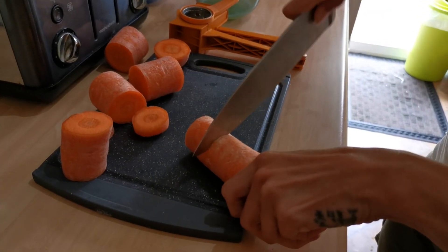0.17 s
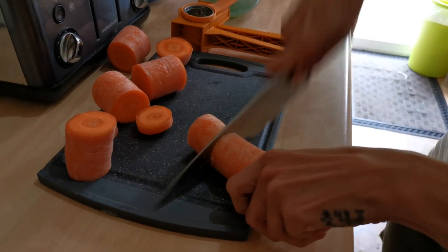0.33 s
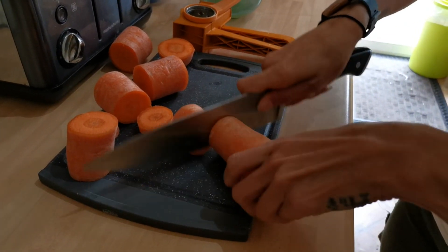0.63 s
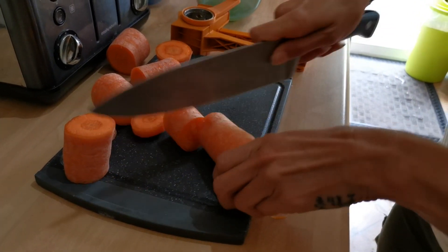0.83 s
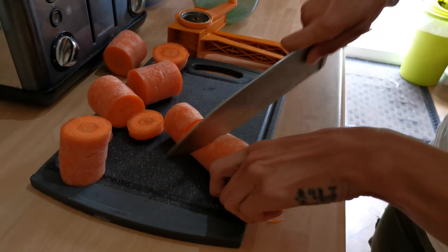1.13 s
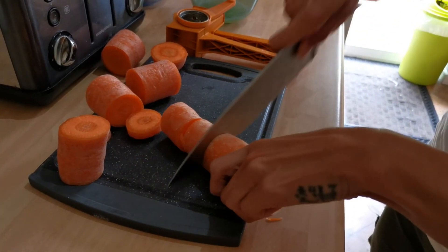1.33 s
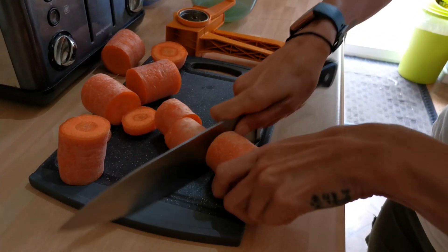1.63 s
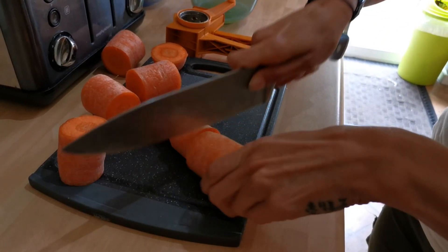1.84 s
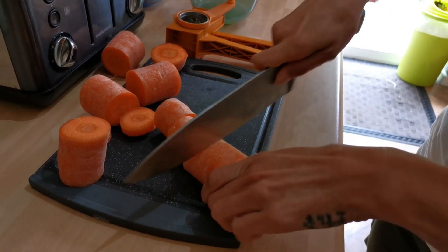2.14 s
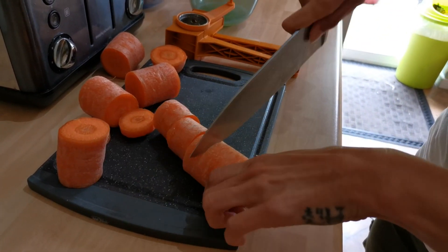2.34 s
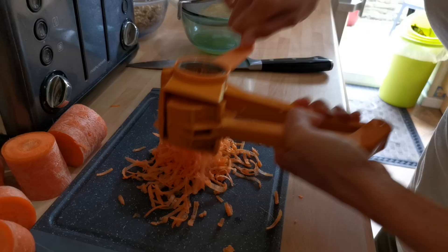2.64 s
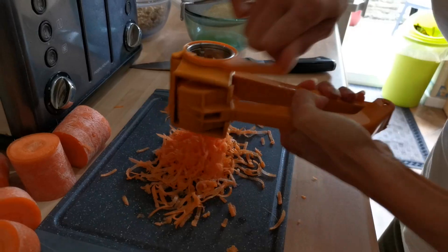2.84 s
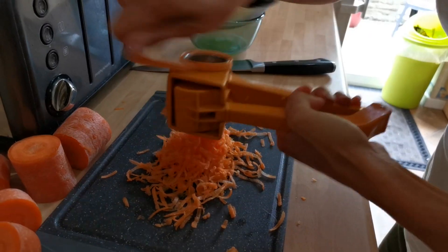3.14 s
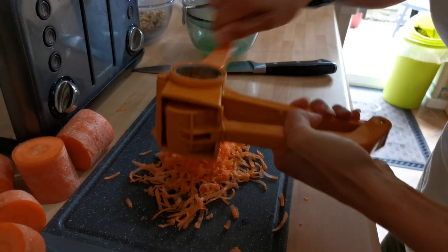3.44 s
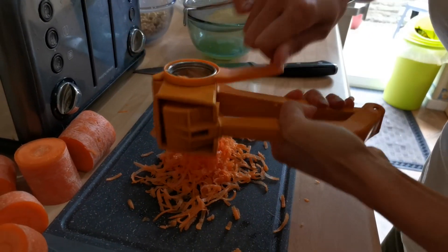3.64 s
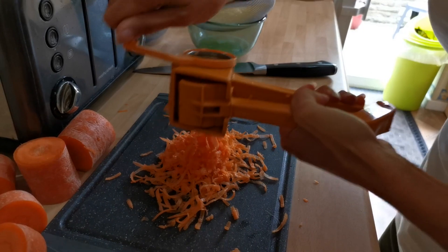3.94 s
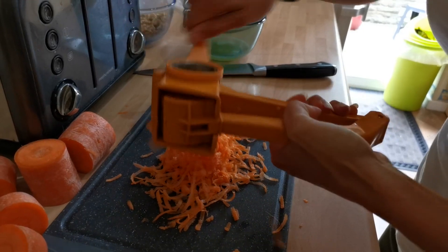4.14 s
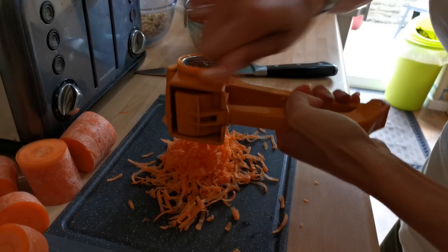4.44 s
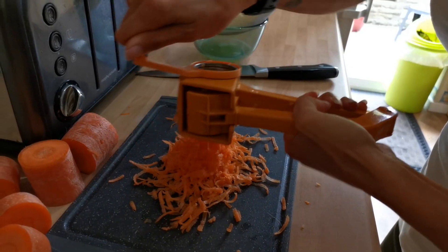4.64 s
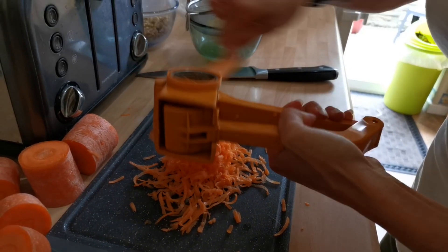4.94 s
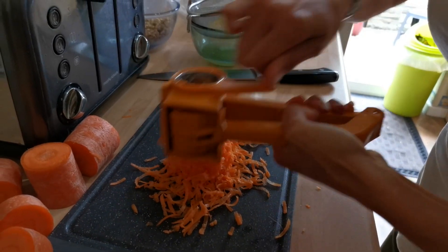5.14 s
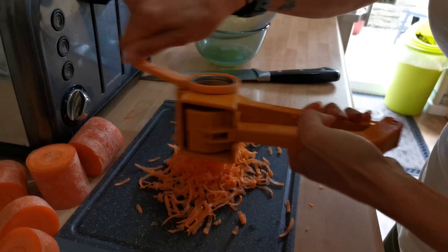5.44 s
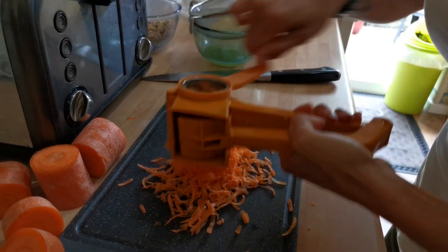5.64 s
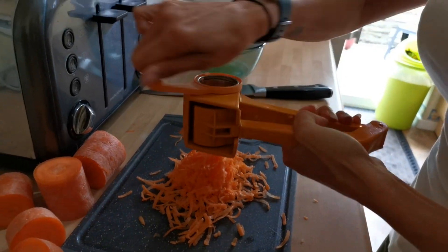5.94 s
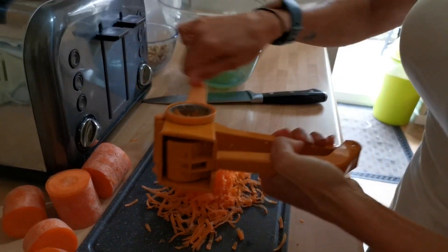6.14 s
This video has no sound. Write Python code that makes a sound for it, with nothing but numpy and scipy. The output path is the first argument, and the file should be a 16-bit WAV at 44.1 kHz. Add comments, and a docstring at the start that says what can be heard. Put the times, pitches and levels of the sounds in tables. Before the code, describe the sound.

In a small, quiet kitchen, a knife cuts a raw carrot three times, about a second apart. Each cut is a short wet hiss, a crisp crack and a knock on a plastic board, with pieces tumbling softly in between. After a brief silence, a hand-cranked drum grater shreds carrot in uneven, rasping strokes with small clicks, over a faint low rumble and motor hum. Everything sounds close.

```python
"""Over faint room tone in a small kitchen, a knife cuts a raw carrot three times on a plastic board.
Each time the blade hisses through crushed cells, the carrot splits and the edge knocks on the board;
loose pieces tumble between the cuts. A short silence follows. Then, over a low rumble and a motor's
hum, a hand-cranked drum grater shreds carrot in uneven strokes: its teeth rasp and fizz through
the flesh and excite the resonances of the drum and its plastic housing."""
import sys
import numpy as np
from scipy import signal
from scipy.fft import rfft, irfft, next_fast_len
from scipy.io import wavfile
from scipy.ndimage import uniform_filter1d

SR = 44100
rng = np.random.default_rng(int(sys.argv[2]) if len(sys.argv) > 2 else 0)


def output_pcm(signal):
    """Save a mono or channel-first signal as 16-bit PCM at the path in sys.argv[1].

    Samples are clipped to [-1, 1] before scaling.
    """
    pcm = np.clip(np.atleast_2d(signal).T, -1, 1) * 32767
    wavfile.write(sys.argv[1], SR, np.round(pcm).astype(np.int16))


N = 277829
TIME = np.arange(N) / SR
HZ = np.fft.rfftfreq(8192, 1 / SR)

# Room tone during the cutting and during the grating: frequency_hz, density_db
QUIET_SPECTRUM = [(12, -32.5), (20, 4.5), (108, 2), (155, -7.5), (638, -15.5), (1140, -23),
                  (2770, -23), (4310, -29), (7720, -25), (9630, -35.5), (15000, -46)]
RUMBLE_SPECTRUM = [(15, -3), (40, 2), (80, -14), (115, -3.5), (170, -12), (300, -19.5), (500, -19),
                   (2000, -56)]
# Tones of an appliance motor: pitch_hz, level_db
HUM_TONES = [(23, -93), (45, -70), (100, -70.5), (149, -82)]
# Reverberation time of the kitchen: frequency_hz, t60_s
KITCHEN_DECAY = [(100, 0.39), (300, 0.33), (1000, 0.29), (3000, 0.29), (8000, 0.31), (15000, .22)]
# Level difference between the channels: frequency_hz, left_minus_right_db
KNIFE_BALANCE = [(100, 0.5), (700, 3), (1200, 1.5), (1500, -2.5), (2100, -2.5), (3000, -6.5), (4200, -5.5),
                 (6000, -7.5), (7200, 6.5), (8200, 13.5), (10500, -3), (15000, -6.5)]
GRATER_BALANCE = [(60, 36), (99, 14), (160, 4), (270, -0.5), (450, -3.5), (740, -4), (1220, -4.5),
                  (2010, -7), (3330, -10.5), (5500, 7.5), (9080, 12.5), (15000, 11.5)]
# Likeness of the channels: frequency_hz, coherence_ratio, left_lead_rad
KNIFE_COHERENCE = [(100, 0.93, 0.013), (400, .98, 0.019), (709, 0.97, 0.31), (1402, 0.6, 0),
                   (3100, 0.2, 0.016), (7000, 0.1, 0.11)]
GRATER_COHERENCE = [(100, 0.24, 3), (860, 1, 1.05), (1560, 0.98, 1.13), (2640, 0.8, 0.75), (3400, 0.48, 3),
                    (4400, 1, 2.5), (6860, 0.26, 3), (7830, 0.069, 9), (15100, 0.06, 13.5)]

# Spectral envelopes of the sources: frequency_hz, density_db
GRATER_SPECTRUM = [(120, -47.5), (200, -30.5), (280, -21.5), (430, -27), (560, -20.5), (790, -17),
                   (1200, -13.5), (1750, -7.5), (2100, -3), (3100, 1.5), (3600, -3), (4300, -9),
                   (5500, -12), (6500, -17.5), (7900, -13.5), (10000, -29), (15000, -33)]
FLESH_SPECTRUM = [(80, -20), (250, -12), (450, -17.5), (620, -7.5), (1000, -15), (2100, -7), (4000, -7.5),
                  (6000, -5), (6700, -2), (7850, -5.5), (9000, -16.5), (11000, -20.5), (15000, -26)]
SPLIT_SPECTRUM = [(60, -33.5), (160, -18.5), (450, -14.5), (650, -11.5), (980, -13), (1300, 0), (2250, -10),
                  (2900, -18), (5500, -23), (8000, -37), (10000, -41.5), (15000, -57)]
BOARD_SPECTRUM = [(40, -26), (110, -8), (270, -1), (460, -4.5), (660, -3), (1250, -2), (2200, -8),
                  (3800, -18), (7500, -29.5), (9500, -48.5), (15000, -66.5)]
PIECE_SPECTRUM = [(40, -16), (120, 10.5), (250, 0), (650, -10), (1000, -21), (3000, -36), (12000, -71)]
SKIN_SPECTRUM = [(200, -17), (900, -16), (1800, -8.5), (4000, -10), (7500, -8), (9500, -22), (15000, -27)]
# Spectral envelope of the board's groan about its pitch: offset_octaves, density_db
GROAN_SPECTRUM = [(-2.5, -35.5), (-0.3, -6.5), (0, -0.5), (-1, -5), (0.3, -17), (3.5, -57.5)]
# Normal modes of the solid bodies: centre_hz, width_hz, lift_db
HOUSING_RESONANCES = [(786, 90, 7.3), (1524, 70, 5.5), (2024, 90, 7.7), (2582, 65, 3.6), (3143, 120, 4.7),
                      (3560, 76, 5.6), (4720, 280, 3.7), (5670, 170, 4.8), (7560, 280, 4.8)]
BOARD_RESONANCES = [(130, 30, 3), (258, 40, 5), (365, 30, 6), (605, 65, 8), (780, 40, 3), (865, 35, 5),
                    (1050, 40, 3), (1170, 50, 5), (1260, 70, 6), (1540, 50, 2), (1860, 70, 4),
                    (2220, 120, 4), (2550, 40, 3), (2890, 50, 6), (4600, 250, 4), (5300, 250, 4)]
BLADE_RESONANCES = [(1840, 61, 9), (2808, 180, 3), (4710, 260, -0.5), (5600, 480, 5), (7800, 320, 5.5)]  # damped by the carrot

# Pushes of the crank: start_s, length_s, attack_s, force_db, relative_treble_db, drum_hz
CRANK_STROKES = [ (3.052, 0.08, 0.046, -36.5, -6, 2750), (3.219, .083, 0.03, -40, -4, 3090),
                 (3.353, 0.16, 0.062, -39, -4, 3180), (3.52, 0.11, 0.081, -35.5, -5, 2680),
                 (3.747, 0.1, .004, -38.5, -4, 2720), (3.906, 0.093, 0.052, -35, -4, 3140),
                 (4.097, 0.13, 0.029, -35.5, -2.5, 3040), (4.23, 0.32, 0.03, -37, -3, 2780),
                 (4.524, 0.15, 0.028, -34.5, -3.5, 2880), (4.805, 0.072, .003, -36.5, 0, 3120),
                 (4.887, 0.093, 0.016, -40, 0, 2930), (4.975, 0.19, .025, -35.5, -2, 2750),
                 (5.197, 0.14, 0.12, -33, -3, 2860), (5.34, 0.048, 0.013, -35.5, -1.5, 2830),
                 (5.403, 0.1, 0.042, -34, -2.5, 2780), (5.581, 0.24, 0.056, -34, -3.5, 2780),
                 (5.838, 0.52, 0.017, -35, -3, 2880), (5.97, 0.33, 0.03, -36.5, -2.5, 2700), ]
# The grater sways in the hand: time_s, balance_db (a rise moves it left)
GRATER_SWAY = [(3.1, -9.5), (3.4, -9), (3.75, -6.5), (4.25, -4), (4.7, -2), (5.15, -5), (5.45, -7),
               (5.8, -6), (6.15, -7)]
# The blade slides lightly over the skin: start_s, length_s, force_db
SKIN_GRAZES = [(0.0, 0.018, -72), (0.056, 0.036, -72), (0.15, 0.031, -71.5), (1.102, .08, -70.5),
               (1.25, 0.051, -63), (2.205, 0.056, -74), (2.314, 0.2, -70.5)]
# The blade wedges into the flesh: start_s, length_s, final_force_db, swell_db, groan_db, groan_hz
KNIFE_SLICES = [(0.294, 0.15, -37.5, 31.5, -62, 477), (1.382, 0.11, -37.5, 28.5, -50, 376),
                (1.536, 0.011, -43, 10.5, -60.5, 353), (2.48, 0.15, -40, 32.5, -48.5, 215),
                (2.571, 0.0036, -49.5, 4, -67, 215)]
# The steel rings after the hardest chop: start_s, pitch_hz, level_db, t60_s
BLADE_PARTIALS = [(1.5906, 5760, -23, .06), (1.5905, 7870, -34, .03)]
# Impulsive events: start_s, level_db, decay_s, tilt_db_per_octave, ring_hz
TOOTH_CATCHES = [(3.071, -46, 0.024, -3.5, 2790), (3.1105, -31, 0.015, -1.5, 3200),
                 (3.2235, -39.5, 0.024, 1.5, 3230), (3.25, -37, 0.017, -1, 3300),
                 (3.743, -35, 0.006, 1.5, 2980), (4.108, -41.5, 0.016, -4, 2770),
                 (4.2013, -27.5, 0.0041, 0.5, 3000), (4.5695, -26.5, 0.011, -2.5, 2720),
                 (4.8085, -32, 0.021, 0, 1940), (5.318, -26.5, 0.01, 0, 2480),
                 (5.4655, -25, 0.0074, 2, 2880), (5.603, -32.5, 0.061, 5.5, 2730),
                 (5.656, -25, 0.0034, 6.5, 3400), (5.9548, -22.5, 0.014, 1, 2250)]  # a tooth tears off a shred
CARROT_SPLITS = [(.4462, -20, 0.013, 0, 2250), (1.5055, -21.5, 0.015, -2, 2150),
                 (2.6412, -19, 0.00874, 2.5, 2340)]  # the carrot cracks ahead of the blade
BOARD_CHOPS = [(.5185, -31.5, 0.0049, -2, 560), (.5228, -20, 0.0096, 0, 714),
               (.5412, -22, 0.011, 2.5, 1220), (1.5812, -20.5, 0.0041, -1.5, 236.4),
               (1.5898, -17.5, 0.012, 1, 604), (1.593, -18, 0.0036, 4, 1200),
               (1.765, -37, 0.011, 0.5, 1140), (2.651, -24.5, 0.0073, 0.5, 777)]  # the edge lands on the board
PIECE_TUMBLES = [(.781, -52.5, 0.028, 4, 620), (.848, -60.5, .034, 7.5, 640), (1.002, -58.5, .012, -1, 140),
                 (1.0838, -56, 0.0011, 5.5, 896), (1.096, -55, 0.025, -8.5, 160),
                 (1.596, -39.5, .025, -15, 90), (1.893, -56.5, 0.0122, 6, 400),
                 (1.906, -53, 0.029, 0.5, 270), (2.065, -68, 0.029, -0.5, 158),
                 (2.16, -59, .025, -6.5, 125), (2.643, -35, 0.014, 4.5, 251.7)]  # cut pieces roll and rock
SKIN_NICKS = [(.68, -50.5, 0.026, -5, 1300), (.944, -64, 0.0022, -7, 1300), (1.0875, -50, 0.0086, 1, 2750),
              (2.1525, -50, 0.017, 1, 2680)]  # the blade touches the skin


def amp(db):
    """Amplitude grows tenfold for every 20 dB."""
    return 10 ** (np.asarray(db) / 20)


def unit_rms(x):
    """Normalisation: the mean of the two channels gets an rms of 1."""
    return x / np.sqrt(np.mean(x.mean(0) ** 2) + 1e-20)


def curve(points, hz=HZ):
    """Interpolation of (frequency_hz, value) points on a logarithmic frequency axis."""
    point_hz, value = np.transpose(points)
    return np.interp(np.log(hz + 1), np.log(point_hz + 1), value)


def add(mix, start_s, sound):
    """Superposition: a stereo sound adds to the mix from start_s on."""
    part = mix[:, round(start_s * SR):][:, :sound.shape[1]]
    part += sound[:, :part.shape[1]]


def panned(x, balance_db):
    """A level difference between the channels moves a sound toward the louder side."""
    return x * amp(np.array([[.5], [-.5]]) * balance_db)


def modal_db(modes):
    """Each normal mode raises a Lorentzian peak in a body's decibel spectrum."""
    return sum(db / (1 + (2 * (HZ - hz) / width_hz) ** 2) for hz, width_hz, db in modes)


def colour(x, spectrum_db, balance_db=0):
    """Causality: a minimum-phase filter rings after each click, never before it."""
    relative_db = np.maximum(spectrum_db - spectrum_db.max(), -100)
    log_gain = np.log(panned(amp(relative_db), balance_db))
    mirrored = np.hstack([log_gain, log_gain[:, -2:0:-1]])
    response = np.exp(np.conj(signal.hilbert(mirrored)))
    taps = irfft(response[:, :len(HZ)])
    return signal.oaconvolve(x, taps[:, :len(HZ)], axes=1)[:, :x.shape[1]]


def resonate(x, hz, width_hz):
    """Forced vibration of a damped oscillator whose natural frequency follows the curve hz."""
    turn = np.exp(2j * np.pi * np.cumsum(hz) / SR)
    pole = np.exp(-np.pi * width_hz / SR)
    return 2 * (turn * signal.lfilter([1 - pole], [1, -pole], x / turn)).real


def cohere(x, coherence):
    """Partial coherence: the right channel takes a share of the left and lags it in phase."""
    size = next_fast_len(x.shape[1] + len(HZ))
    left, independent = rfft(x, size)
    hz, coherence = np.fft.rfftfreq(size, 1 / SR), np.array(coherence)
    shared = np.clip(curve(coherence[:, :2], hz), 0, 1)
    lead_rad = curve(coherence[:, ::2], hz)
    right = (shared * left + np.sqrt(1 - shared ** 2) * independent) * np.exp(-1j * lead_rad)
    return irfft([left, right], size)[:, :x.shape[1]]


def flutter(per_s):
    """Random modulation: straight lines join Gaussian values of unit variance."""
    knots = np.arange(0, N / SR + 1, 1 / per_s)
    return np.interp(TIME, knots, rng.standard_normal(N)[:len(knots)])


def crackle(per_s, spread_db, grain_s, size=256):
    """Shot noise: cells burst at random times as tiny puffs of unequal strength."""
    strength = amp(spread_db * np.minimum(rng.exponential(1, N), 5))
    bursts = rng.random(N) < per_s / SR
    grain = np.exp(-2 * np.arange(size) / SR / grain_s)
    power = signal.oaconvolve(strength ** 2 * bursts, grain)[:N]
    return np.sqrt(abs(power)) * rng.standard_normal((2, N))


def burst(decay_s, size=8192):
    """Broadband excitation: a dying cluster of tiny fractures, even in spectrum."""
    fade = np.exp(-np.arange(size) / SR / decay_s)
    x = rng.standard_normal((2, size)) * fade
    for _ in range(4):  # flatten the spectrum, then restore the decay
        spectrum = rfft(x)
        x = irfft(spectrum / (abs(spectrum) + 1e-12)) * np.minimum(1, 2 * np.sqrt(fade))
    return x


def impacts(events, body_db, balance, coherence, ring_db, ring_width_ratio, level_samples=441):
    """Impulse response: short bursts excite a body, and each contact point favours one resonance."""
    out = np.zeros((2, N))
    for start_s, level_db, decay_s, tilt_db_per_octave, ring_hz in events:
        tilt_db = tilt_db_per_octave * np.log2(HZ / 1000 + .05)
        peak_db = modal_db([(ring_hz, ring_width_ratio * ring_hz, ring_db)])
        hit = colour(cohere(burst(decay_s), coherence), body_db + tilt_db + peak_db, curve(balance))
        onset_rms = np.sqrt(np.mean(hit[:, :level_samples] ** 2))
        add(out, start_s, amp(level_db) * hit / onset_rms)
    return out


def press(start_s, length_s, attack_s, fall_db_per_s, swell_db=0, arch_db=0):
    """Amplitude envelope of a push: linear attack, a hold that swells or arches, exponential release."""
    t = TIME - start_s
    progress = np.clip(t / length_s, 0, 1)
    hold_db = swell_db * (progress - 1) + arch_db * (np.sin(np.pi * progress) - 2 / np.pi)
    release_db = fall_db_per_s * np.maximum(t - length_s, 0)
    return np.clip(t / attack_s, 0, 1) * amp(hold_db - release_db)


def room_tone(spectrum, level_db):
    """Stationary noise of the house, with most of its energy at low frequencies."""
    noise = cohere(rng.standard_normal((2, N)), KNIFE_COHERENCE)
    return amp(level_db) * unit_rms(colour(noise, curve(spectrum), balance_db=4.5))


def motor_hum(waver_db=4.5):
    """Periodic vibration of a motor radiates low tones, each wavering in level."""
    return sum(np.sqrt(2) * amp(db + waver_db * flutter(per_s=10))
               * np.sin(2 * np.pi * (hz * TIME + rng.random())) for hz, db in HUM_TONES)


def kitchen(x, coherence, tail_db, early_db, early_decay_s, size=26000):
    """Reverberation: early reflections from nearby surfaces precede an exponentially dying tail."""
    t = np.arange(size) / SR
    hz, frame_s, noise = signal.stft(rng.standard_normal((2, size)), SR, nperseg=256)
    decay = amp(-60 * frame_s / curve(KITCHEN_DECAY, hz)[:, None])
    tail = signal.istft(noise * decay, SR)[1][:, :size]
    tail *= np.clip((t - .006) / 0.0097, 0, 1)
    early = rng.standard_normal((2, size)) * np.exp(-t / early_decay_s) * (t > .002)
    echo = amp(tail_db) * tail / np.linalg.norm(tail[0])
    echo += amp(early_db) * early / np.linalg.norm(early[0])
    diffuse = [(f, shared, 0) for f, shared, _ in coherence]  # echoes come from all sides
    return x + signal.oaconvolve(x, cohere(echo, diffuse), axes=1)[:, :N]


def cranking(idle_db=-66, uneven_db=0.82, dull_start_db=5.5, bite_in_s=0.032):
    """Driving force: the strongest push of the moment sets level, treble and drum resonance."""
    pushes = np.array([amp(db) * press(start_s, length_s, attack_s, fall_db_per_s=368, arch_db=1)
                       for start_s, length_s, attack_s, db, _, _ in CRANK_STROKES])
    start_s, _, _, _, treble_db, drum_hz = np.array(CRANK_STROKES)[pushes.argmax(0)].T
    # the fizz comes only as the teeth sink in
    treble_db = treble_db - dull_start_db * np.exp(-np.maximum(TIME - start_s, 0) / bite_in_s)
    force_db = 20 * np.log10(pushes.max(0) + amp(idle_db)) + uneven_db * flutter(per_s=28)
    return force_db, uniform_filter1d(treble_db, size=400), uniform_filter1d(drum_hz, size=400)


def drum_ring(drum_hz, width_hz=480):
    """Resonance of the drum, which shifts as the carrot presses on other parts of it."""
    hz = drum_hz * (1 + 0.079 * flutter(per_s=48))
    drive = cohere(crackle(per_s=700, spread_db=-4.5, grain_s=0.0012), GRATER_COHERENCE)
    return resonate(resonate(drive, hz, width_hz), hz, width_hz)


def grater(rasp_db=-2, fizz_db=-1, drum_db=-5, crossover_hz=4600):
    """Source and filter: the housing colours the coarse rasp and wet fizz of tearing, and the drum."""
    force_db, treble_db, drum_hz = cranking()
    body_db = curve(GRATER_SPECTRUM) + modal_db(HOUSING_RESONANCES)
    balance_db = curve(GRATER_BALANCE)
    low_share = 1 / (1 + (HZ / crossover_hz) ** 10)
    chatter = flutter(per_s=130)  # rows of teeth bite unevenly
    coarse = cohere(crackle(per_s=2200, spread_db=1, grain_s=0.002), GRATER_COHERENCE)
    fine = cohere(crackle(per_s=18000, spread_db=4, grain_s=0.00089), GRATER_COHERENCE)
    rasp = unit_rms(colour(coarse, body_db + 10 * np.log10(low_share + 1e-9), balance_db))
    fizz = unit_rms(colour(fine, body_db + 10 * np.log10(1 - low_share + 1e-9), balance_db))
    ring = unit_rms(colour(drum_ring(drum_hz), body_db, balance_db))
    # deep-cutting teeth fizz and rasp; skidding teeth mostly ring the drum, which faces right
    bite_db = treble_db + 4  # treble above its usual level
    scrape = amp(rasp_db + 0.18 * bite_db) * rasp + amp(drum_db - 0.18 * bite_db) * ring
    sway_db = np.interp(TIME, *np.transpose(GRATER_SWAY)) + 9.5  # zero at the starting position
    scrape = panned(scrape * amp(force_db + 1.13 * chatter), sway_db + 0.13 * bite_db)
    scrape += fizz * amp(force_db + treble_db + fizz_db + 0.46 * chatter)
    scrape += impacts(TOOTH_CATCHES, body_db, GRATER_BALANCE, GRATER_COHERENCE,
                      ring_db=8, ring_width_ratio=0.1)
    return kitchen(scrape, GRATER_COHERENCE, tail_db=-18, early_db=-8.5, early_decay_s=0.0027)


def blade_ring():
    """Free vibration: high modes of the steel die away as damped sinusoids."""
    out, t = np.zeros((2, N)), TIME[:SR // 2]
    for start_s, hz, level_db, t60_s in BLADE_PARTIALS:
        ring = amp(level_db - 60 * t / t60_s) * np.sin(2 * np.pi * hz * t)
        add(out, start_s, panned(ring, curve(KNIFE_BALANCE, hz)))
    return out


def slicing(hiss_db=1, groan_exponent=0.64):
    """Fracture and friction: crushed cells hiss louder as the blade sinks; drag makes the board groan."""
    balance_db = curve(KNIFE_BALANCE)
    force = sum(amp(db) * press(start_s, length_s, attack_s=0.035, fall_db_per_s=170)
                for start_s, length_s, db in SKIN_GRAZES)
    slips = cohere(crackle(per_s=400, spread_db=1, grain_s=.005), KNIFE_COHERENCE)
    groan = np.zeros((2, N))
    for start_s, length_s, force_db, swell_db, groan_db, groan_hz in KNIFE_SLICES:
        push = press(start_s, length_s, attack_s=.008, fall_db_per_s=418.5, swell_db=swell_db)
        force += amp(force_db) * push
        shape_db = np.interp(np.log2((HZ + 1) / groan_hz), *np.transpose(GROAN_SPECTRUM))
        groan += amp(groan_db) * push ** groan_exponent * unit_rms(colour(slips, shape_db, balance_db))
    cells = cohere(crackle(per_s=2600, spread_db=1.8, grain_s=.0008), KNIFE_COHERENCE)
    hiss = unit_rms(colour(cells, curve(FLESH_SPECTRUM) + modal_db(BLADE_RESONANCES), balance_db))
    return amp(hiss_db) * force * hiss + groan


def knife():
    """Modal excitation: splits, chops and loose pieces ring the board; light touches ring the blade."""
    board_db = modal_db(BOARD_RESONANCES)
    steel_db = 1.14 * modal_db(BLADE_RESONANCES)  # the blade rings more when clear of the carrot
    stereo = KNIFE_BALANCE, KNIFE_COHERENCE
    splits = impacts(CARROT_SPLITS, curve(SPLIT_SPECTRUM) + board_db, *stereo,
                     ring_db=4, ring_width_ratio=.15)
    chops = impacts(BOARD_CHOPS, curve(BOARD_SPECTRUM) + board_db, *stereo,
                    ring_db=5, ring_width_ratio=.4)
    tumbles = impacts(PIECE_TUMBLES, curve(PIECE_SPECTRUM) + board_db, *stereo,
                      ring_db=7.5, ring_width_ratio=0.89, level_samples=1300)
    nicks = impacts(SKIN_NICKS, curve(SKIN_SPECTRUM) + steel_db, *stereo,
                    ring_db=10, ring_width_ratio=0.079)
    direct = slicing() + splits + panned(chops + tumbles, balance_db=0.1) + nicks
    return blade_ring() + kitchen(direct, KNIFE_COHERENCE, tail_db=-7.5, early_db=-11, early_decay_s=.007)


def scene(cutting_end_s=2.6625, grating_start_s=3.068):
    """Gating: the scene changes; the cutting is cut off abruptly, and after a silence the grating comes in
    already under way."""
    fade_out = np.exp(-np.maximum(TIME - cutting_end_s, 0) / 0.0056)
    fade_in = np.clip((TIME - grating_start_s) / 0.0017, 0, 1)
    cutting = knife() + room_tone(QUIET_SPECTRUM, level_db=-67.5)
    grating = grater() + room_tone(RUMBLE_SPECTRUM, level_db=-63) + motor_hum()
    return fade_out * cutting + fade_in * grating


def record(dry, cutoff_hz=15300):
    """Band limiting: a linear-phase low-pass filter removes the highest treble."""
    taps = signal.firwin(511, cutoff_hz, window=("kaiser", 9), fs=SR)
    return signal.oaconvolve(dry, taps[None], "same")


dry = scene()
out = record(dry)
output_pcm(out)
```